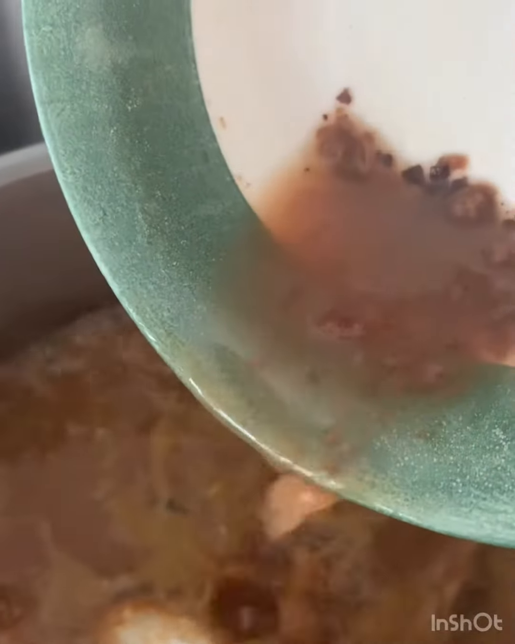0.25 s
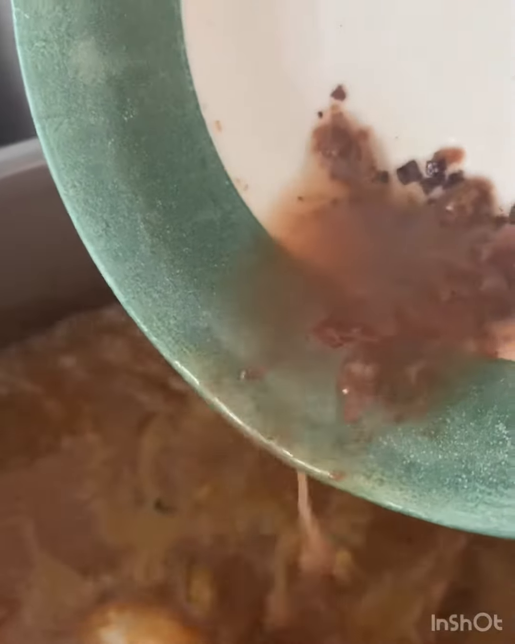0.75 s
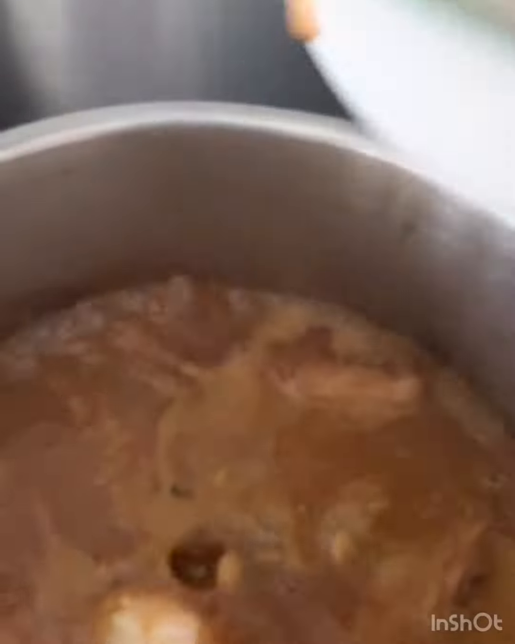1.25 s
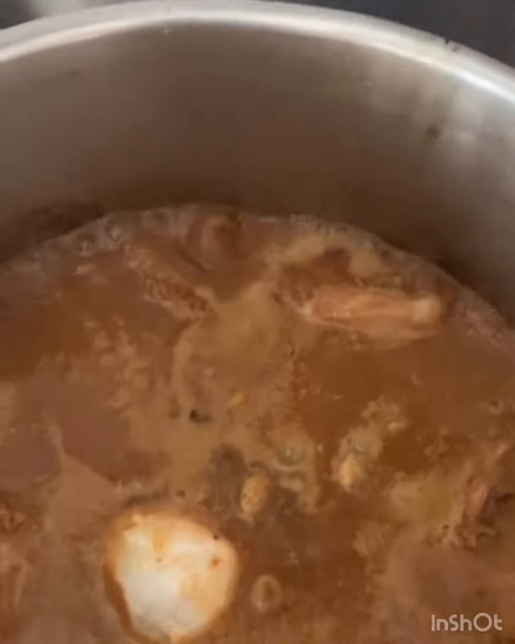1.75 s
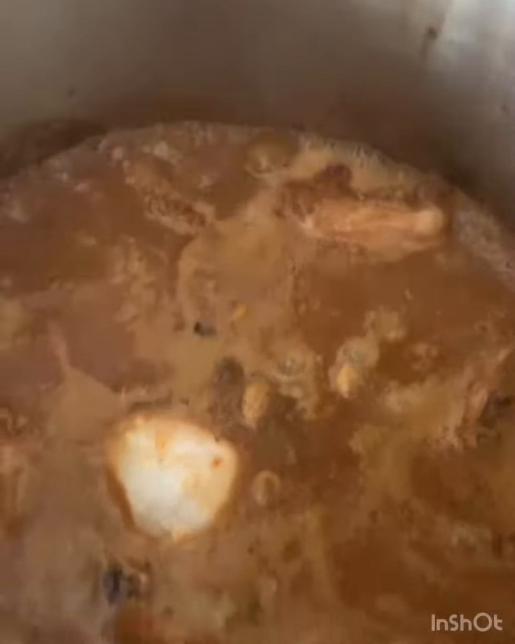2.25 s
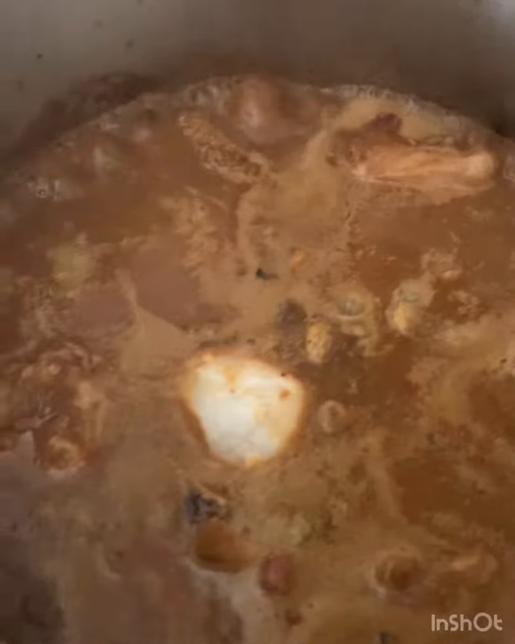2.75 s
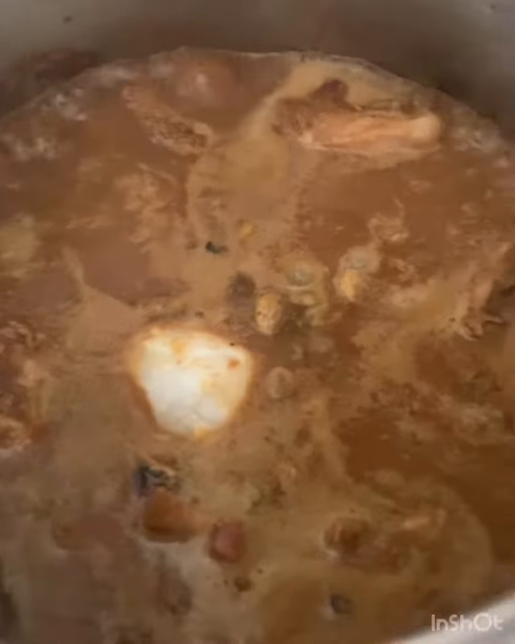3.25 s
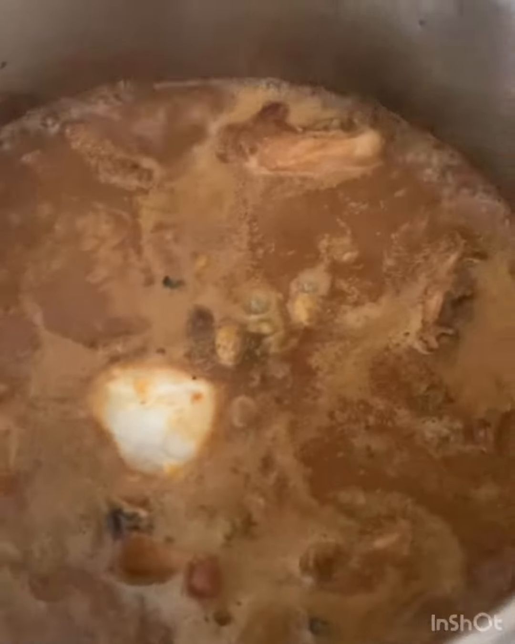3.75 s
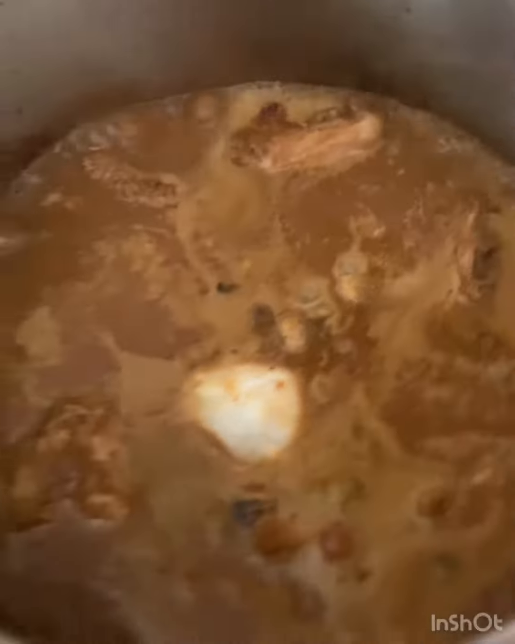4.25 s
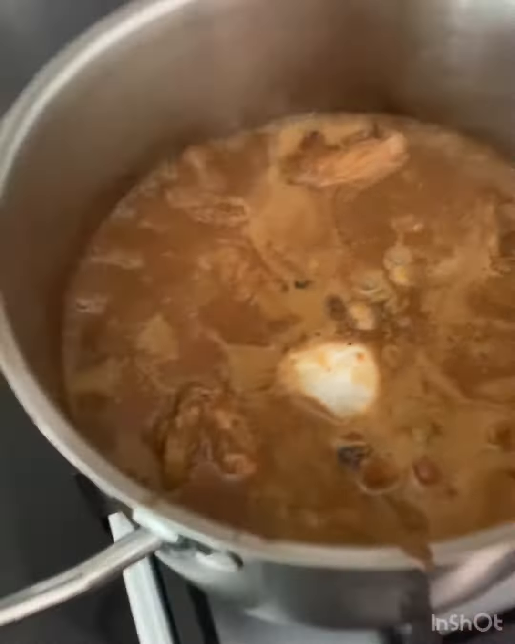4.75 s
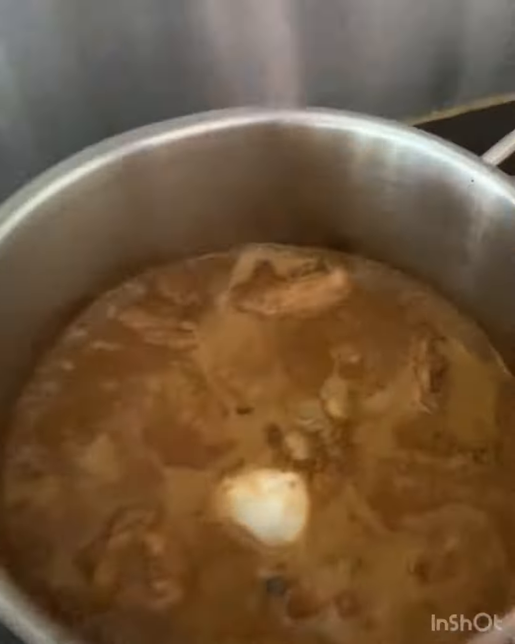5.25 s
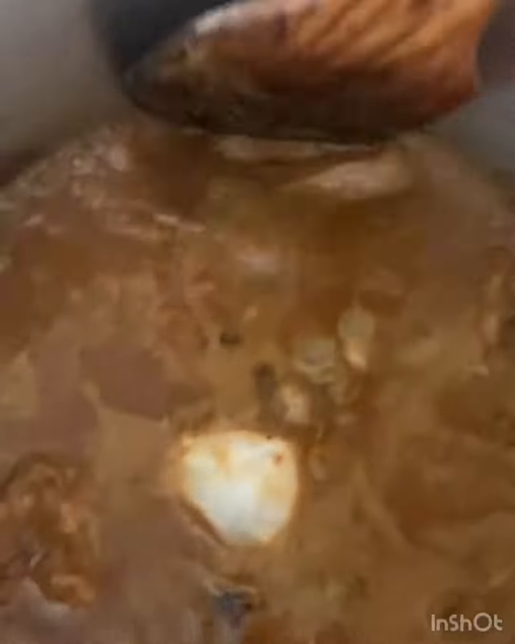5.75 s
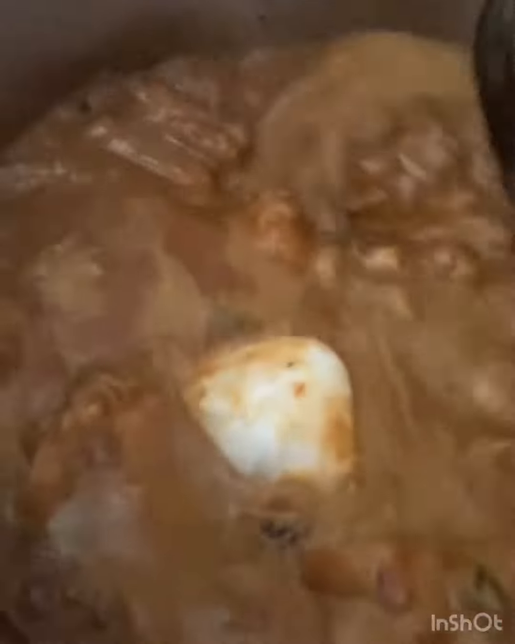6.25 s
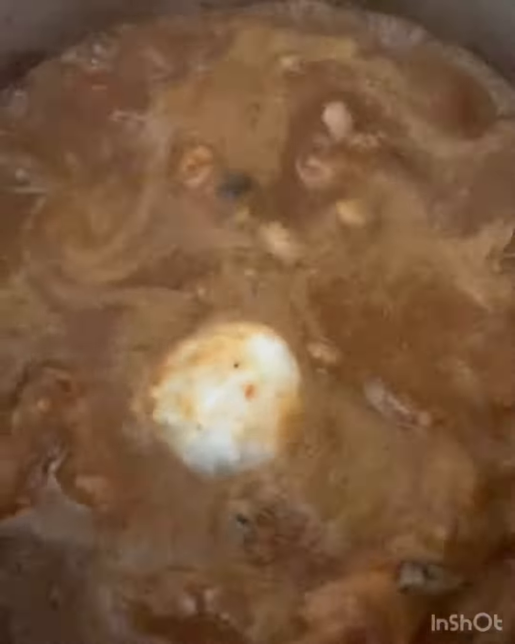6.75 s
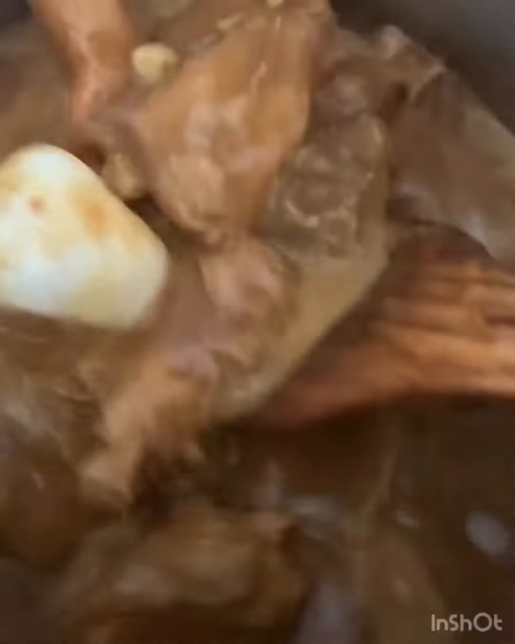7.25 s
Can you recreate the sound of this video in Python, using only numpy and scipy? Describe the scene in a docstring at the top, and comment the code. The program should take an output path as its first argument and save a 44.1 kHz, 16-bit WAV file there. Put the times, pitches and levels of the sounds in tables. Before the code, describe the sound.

Thick stew sizzles and spits in a steel pot under a humming cooker hood, with knocks and a wooden spoon scraping.

```python
"""Stew simmering under a cooker hood

Close on a pot of thick stew on a gas stove, from a hand-held phone with two microphone ports.
The hood fan hums overhead, its air changing colour as the phone moves in and draws back.
Stew pushed up the hot steel wall sizzles and spits. Dishes and a wooden spoon knock on pot and
stove, the kitchen answers, and near the end the spoon scrapes along the wall."""
import sys
import numpy as np
from scipy import signal
from scipy.fft import rfft, irfft, next_fast_len
from scipy.io import wavfile
from scipy.ndimage import uniform_filter1d, map_coordinates

SR = 44100
rng = np.random.default_rng(int(sys.argv[2]) if len(sys.argv) > 2 else 0)


def int16_out(signal):
    """Quantize to a 16-bit WAV file."""
    q = np.round(np.clip(np.atleast_2d(signal).T, -1, 1) * 32767)
    wavfile.write(sys.argv[1], SR, q.astype(np.int16))


N = 330750  # 7.5 s

# Smooth spectra of the hood's rumble and rushing air: (frequency [Hz], relative level [dB])
RUMBLE_SPECTRUM = [(12, -50), (30, -35), (55, -5), (70, -5.5), (150, -9.5), (250, -26), (300, -20),
                   (400, -70)]
AIR_SPECTRUM = [(140, -17), (250, -11), (450, -9), (900, -9), (1400, -17.5), (1900, -19.5), (4500, -26),
                (6000, -112), (10000, -120)]
# Low duct resonances: (frequency [Hz], width [Hz], gain [dB])
DUCT_LOW_MODES = [(88.5, 14.5, 3), (99, 5.4, 3.5), (125.7, 6.7, -1.5), (195, 32, -5), (212, 13.7, -3),
                  (245, 16, -10)]
# Higher ones, from two positions: (frequency [Hz], width [Hz], gain at the pot [dB], gain away [dB])
DUCT_HIGH_MODES = [(303, 7.5, -6, -9.5), (377, 17.6, -6, -6), (530, 28, 1, 4), (611, 27.4, 6, -16.5),
                   (783, 22, -31, 0), (1097, 38, -4, -6), (1330, 93, -6, -13), (1597, 63, -12.5, -14)]
# Where the phone is held: (time [s], distance from the pot [0 near, 1 away])
MIC_DISTANCE = [(0, 0.97), (1.4, 0.45), (2, 0.018), (4.2, 0.029), (4.8, 0.87), (5.3, 1), (5.65, 0.044),
                (7.5, 0.089)]
# Jolts of the hand on the phone: (time [s], level [dB])
HAND_JOLTS = [(3.84, -39), (6.37, -42), (6.75, -34), (7.45, -38)]
# Steady sizzle on the hot wall: (time [s], level [dB])
SIMMER_LEVEL = [(0, -44.5), (.9, -48), (1.6, -46), (2.0, -50.5), (2.4, -53.5), (3.2, -53.5), (3.6, -51),
                (4.9, -54), (5.15, -59.5), (5.5, -54.5), (6.0, -46), (7.5, -41)]
# Fresh stew wets the wall: (start [s], rise [s], hold [s], peak [dB], fade [dB/s],
# extra fine fizz [dB], extra coarse fizz [dB])
SIZZLE_SURGES = [(0.258, 0.05, 0.053, -40, 16, 5.5, -5), (1.11, 0.024, 0.1, -49, 7.9, 14, -6),
                 (3.36, 0.021, .02, -52.5, 49, 21, -3), (3.54, .03, .06, -67, 27, 21, 0),
                 (5.628, 0.042, 0.037, -32.5, 93, 2.8, -1), (6.08, 0.057, 0.032, -34, 93, 8.3, 0),
                 (6.238, 0.022, 0.089, -33.5, 65, 4, 2.5), (6.428, 0.044, 0.02, -38, 63, 9.4, -3),
                 (6.838, 0.027, 0.034, -38.5, 24, 2, 2.5), (7.0, 0.12, 0.051, -35, 40, 1, 1.5),
                 (7.122, 0.011, 0.02, -22.5, 74, 6, 3.5), (7.141, 0.025, 0.03, -22.5, 68, 9.1, 4),
                 (7.175, 0.02, 0.025, -24.5, 84, 5, 6), (7.235, .02, 0.04, -28, 60, 12, -1),
                 (7.3, 0.028, 0.036, -36, 66, 4.2, 2), (7.415, 0.034, .06, -28, 20, 6.4, -6)]
# Colour of the fizz: (frequency [Hz], relative level [dB])
FIZZ_SPECTRUM = [(600, -3.5), (900, -14), (1350, 7), (1600, 2), (1920, 8), (2300, 5), (2700, 5), (3300, 4),
                 (4500, 2.5), (6500, 5), (10000, 3.5), (16500, -5.5)]
# The loudest droplets: (time [s], level [dB], pitch [Hz])
LOUD_SPITS = [(0.0223, -7.5, 7500), (0.049, -17, 9470), (0.076, -21.5, 6760), (0.163, -16, 9600),
              (1.1263, -30, 13800), (1.405, -22, 6350), (1.7809, -22, 7900), (2.102, -26, 8210),
              (2.143, -22, 8750), (2.4568, -30, 8220), (2.7067, -31, 6700), (2.7801, -28, 8540),
              (2.8185, -30, 7240), (3.093, -39, 8130), (3.2397, -41, 8000), (3.3793, -20, 13900),
              (3.392, -20, 12700), (3.466, -26, 13300), (3.5518, -24, 14000), (3.6027, -24, 15000),
              (3.6284, -28.5, 13100), (3.7459, -26, 14100), (3.8406, -23.5, 7960), (3.8546, -25, 7300),
              (3.9963, -23.5, 4200), (3.9968, -21, 9000), (4.0034, -24, 6800), (4.1586, -35, 8070),
              (4.487, -30, 7410), (4.8823, -30, 7150), (4.9402, -26, 8140), (4.7288, -41, 8000),
              (4.9626, -24, 8800), (5.0585, -34, 8000), (5.2561, -39, 8000), (5.2845, -24.5, 7460),
              (5.3399, -32, 8000), (5.5874, -23, 8210), (5.6391, -23, 6520), (5.6744, -31, 6520),
              (5.683, -12.5, 6600), (5.8521, -16, 6980), (5.903, -18.5, 8900), (6.0133, -21, 8750),
              (6.112, -21, 8230), (6.14, -26, 8200), (6.2801, -8, 10200), (6.3365, -14, 8750),
              (6.3747, -8, 8810), (6.419, -14, 7750), (6.549, -14.5, 9630), (6.849, -15, 8250),
              (6.8957, -16, 9560), (6.9205, -15, 7000), (6.9212, -24, 2800), (6.9284, -17, 8140),
              (7.0282, -10, 14100), (7.0539, -19, 8870), (7.0784, -20, 7040), (7.1282, -15, 7660),
              (7.1347, -16, 9530), (7.157, -2, 8420), (7.2334, -7, 9350), (7.247, -8, 9240),
              (7.2644, -15, 8290), (7.316, -6, 9510), (7.3497, -14, 8200), (7.423, -22, 8300),
              (7.437, -6, 8200), (7.472, -6.5, 8250), (7.4924, -16, 7500)]
# Blows on pot and stove: (time [s], clack peak [dB], clack centre [Hz], clack width [Hz], rattle [s],
# thud peak [dB], push [s], lift of the stove's narrow modes [dB], room send [dB])
BLOWS = [(0.163, -16.5, 2000, 3000, 0.0064, -40, .0006, -3, 2),
         (.168, -11.5, 1930, 450, 0.0065, -31, 0.00065, 0, -10),
         (.177, -11, 1730, 500, 0.0064, -37, 0.00085, 2, -4),
         (.170, -16, 980, 500, 0.016, -25, 0.00049, -4, -1.5),
         (.185, -18, 875, 450, 0.0062, -28.5, 0.0013, -2, -8.5),
         (0.188, -12.5, 1760, 600, 0.0063, -32, 0.0005, -5, -14),
         (0.202, -21, 1550, 500, 0.006, -40, .0009, 0, -10),
         (.212, -22, 1480, 1600, 0.033, -40, 0.00088, 2, -1),
         (3.7945, -14.5, 1960, 400, 0.0069, -25, 0.0012, -3, -11),
         (3.7905, -20, 1290, 397, 0.037, -8, 0.0026, -5.5, -8.5),
         (3.796, -18, 585, 400, 0.0098, -7, 0.0049, -6.5, -9),
         (3.821, -26, 1500, 890, 0.022, -24, 0.0038, 7, -5),
         (3.849, -30, 1870, 1000, 0.04, -28, 0.0019, 0, -10),
         (4.566, -37, 1500, 3000, 0.028, -37, 0.0021, 0, -4),
         (4.583, -24, 1200, 3500, 0.015, -26, 0.002, 2, -8.5),
         (4.636, -33, 1300, 2000, 0.016, -26, 0.0027, -9, -3.5),
         (5.684, -13, 3200, 3000, 0.005, -40, .001, 0, -14),
         (5.683, -11, 1560, 220, 0.003, -11.5, 0.00074, -6, -34),
         (5.684, -9, 625, 298, 0.0015, -18, 0.0014, 14, -11.5),
         (5.694, -19.5, 1130, 300, 0.013, -18, 0.0022, 8, -9.5),
         (6.288, -20.5, 1390, 700, 0.013, -44, 0.00071, 2, -8),
         (6.3725, -16, 3120, 1500, 0.0033, -42, 0.0011, -2, -20),
         (6.373, -7, 1930, 1190, 0.0033, -16, 0.0015, -16, -19),
         (6.374, -14.5, 630, 300, 0.0033, -16.5, 0.00098, 21, -9.5),
         (6.376, -6, 2330, 300, 0.0033, -40, 0.0017, 0, -28),
         (6.4183, -16, 2610, 2000, 0.004, -31, .002, 0, -18),
         (6.423, -12.5, 2180, 800, 0.0042, -17.5, 0.0019, 1, -24),
         (6.479, -24, 2260, 300, 0.01, -30, 0.0027, 5, -16),
         (6.692, -16.5, 700, 800, 0.0051, -15.5, 0.0042, -2, -11),
         (6.736, -20.5, 734, 500, 0.0038, -32, 0.00095, -12, -25),
         (6.805, -24, 1180, 2000, 0.0023, -47, 0.0012, 3, -1)]
# Ring of pot and dishes, and of the stove: (frequency [Hz], width [Hz], gain [dB])
POT_MODES = [(590, 190, 3), (806, 150, 2), (1023, 90, -1), (1150, 88, -2), (1316, 43, 6), (1564, 79, -4.5),
             (1766, 64, 5), (1870, 90, -6.5), (1984, 68, 4), (2320, 100, -1.5), (2620, 70, 1.5),
             (3130, 88, 6), (3620, 93, -4), (3860, 72, -12), (4400, 200, 1)]
STOVE_MODES = [(125.7, 17, 5), (210.2, 13, 15), (312, 105, 0.5), (371, 9.4, 18), (435, 30, 8),
               (535, 68, 15), (595, 97, 13.5), (696, 32, 6), (980, 52, -12)]
# Reverberation of the kitchen: (frequency [Hz], time to fall 60 dB [s])
KITCHEN_DECAY = [(150, 0.1), (500, 0.43), (2500, 0.23), (8000, 0.11)]
# The spoon drags along the wall: (time [s], level [dB])
SCRAPE_LEVEL = [(5.7, -90), (5.75, -54), (6.162, -41), (6.298, -44), (6.372, -33.5), (6.516, -42.5),
                (6.734, -52), (7.0, -40), (7.12, -44), (7.4, -38.5), (7.5, -45)]
# Ring of its wooden blade: (frequency [Hz], width [Hz], gain [dB])
SPOON_MODES = [(713, 100, 8.5), (1400, 110, 5), (2080, 260, 4.5), (3060, 480, -18)]
# How alike the two microphone ports hear: (frequency [Hz], likeness [0-1])
PORT_LIKENESS = [(60, .998), (180, .99), (300, .7), (440, .3), (560, .45), (750, .45), (1000, .35),
                 (2000, .55), (3200, .3), (5000, .85), (16000, .9)]
# Path round the phone: (frequency [Hz], left phase lead [rad])
PORT_LEAD = [(0, 0), (250, .05), (400, .6), (520, -1.8), (650, -.3), (1300, -1.8), (1800, 1.6), (3100, 3),
             (4000, 1.2), (5300, 3.14), (8300, 6.28), (11600, 9.42), (14800, 12.56), (17000, 14)]
# Balance of the ports: (frequency [Hz], left minus right [dB])
PORT_BALANCE = [(60, 0), (150, -1), (280, -.5), (550, -3.6), (1000, -.5), (2000, .6), (8000, -.1)]

DIRECT = [[1], [0]]  # sources have two rows, direct and scattered; this feeds only the first
SIZZLE_REF_DB = -40  # fizz and small spits follow the sizzle's level relative to this


def amp(db):
    return 10 ** (np.asarray(db) / 20)


def unit_rms(x):
    return x / np.sqrt(np.mean(x ** 2) + 1e-20)


def along(points, hz):
    """Read (frequency, value) points on a log axis."""
    f, values = np.transpose(points)
    return np.interp(np.log(hz + 1), np.log(f + 1), values)


def curve(points):
    """Read (time, value) points at every sample."""
    return np.interp(np.arange(N) / SR, *np.transpose(points))


def wobble(rate):
    """A smooth random curve, rate knots a second."""
    return map_coordinates(rng.standard_normal(int(N * rate / SR) + 4), [np.arange(N) * rate / SR])


def filtered(x, response):
    """Filter x by a complex response of frequency."""
    m = next_fast_len(N + SR // 2)
    return irfft(rfft(x, m) * response(np.fft.rfftfreq(m, 1 / SR)), m)[..., :N]


def resonance(f, hz, width):
    """One causal resonance, gain 1 at its centre."""
    return 1j * f * width / (hz * hz - f * f + 1j * f * width)


def patchy_noise(depth_db):
    """Two white noises that share patches of random gain."""
    spectra = signal.stft(rng.standard_normal((2, N)), nperseg=512)[2]
    patches = uniform_filter1d(uniform_filter1d(rng.standard_normal(spectra.shape[1:]), 8, 0), 8, 1)
    return signal.istft(spectra * amp(depth_db * unit_rms(patches)), nperseg=512)[1][:, :N]


def draught(spectrum, modes, patchy_db):
    """Steady air noise: a smooth spectrum with the duct's resonances standing on it."""
    def response(f):
        peak_power = sum(np.abs(amp(db) * resonance(f, hz, w)) ** 4 for hz, w, db in modes) ** .5
        return np.sqrt(amp(along(spectrum, f)) ** 2 + peak_power)
    return unit_rms(filtered(patchy_noise(patchy_db), response))


def rushing_air():
    """The duct's colour cross-fades as the microphone moves to and from the pot."""
    away = np.clip(curve(MIC_DISTANCE), 0, 1)
    near = draught(AIR_SPECTRUM, [(hz, w, db) for hz, w, db, _ in DUCT_HIGH_MODES], patchy_db=1.4)
    far = draught(AIR_SPECTRUM, [(hz, w, db) for hz, w, _, db in DUCT_HIGH_MODES], patchy_db=1.4)
    return np.sqrt(1 - away) * near + np.sqrt(away) * far


def hood():
    """Overhead, the fan's blade tone wavers over duct rumble and air; both start louder and settle."""
    t = np.arange(N) / SR
    blade_db = -35 + wobble(3.6)
    blade_hz = 132.3 + 1.52 * wobble(8)
    tone = amp(blade_db) * np.sqrt(2) * np.sin(2 * np.pi * np.cumsum(blade_hz) / SR)
    rumble_db = -36 + 6.5 * np.exp(-t / .19) - .14 * wobble(3.02)
    rumble = amp(rumble_db) * draught(RUMBLE_SPECTRUM, DUCT_LOW_MODES, patchy_db=1)
    lift_db = np.clip(2 * (t - 5.1), 0, 1)  # the air is a little louder once stirring begins
    air_db = -39 + 3.5 * np.exp(-t / 1.3) + lift_db - .14 * wobble(2.88)
    return rumble + amp(air_db) * rushing_air() + tone * DIRECT


def handling():
    """The hand-held phone sways: low pressure on both ports alike, with a few short jolts."""
    t = np.arange(N) / SR
    sway = filtered(rng.standard_normal(N), lambda f: resonance(f, hz=39, width=28) ** 2)
    jolts = sum(amp(db) * np.exp(-((t - when) / .11) ** 2) for when, db in HAND_JOLTS)
    sway_db = -45.5 - .5 * wobble(3.67)
    return (amp(sway_db) + jolts) * unit_rms(sway) * DIRECT


def sizzle_levels():
    """Surges swell, hold and fade over the simmer: level, extra fine and extra coarse fizz in dB."""
    t = np.arange(N) / SR
    power = amp(curve(SIMMER_LEVEL)) ** 2
    tint = np.zeros((2, N))
    for start, rise, hold, db, fade, *extra_db in SIZZLE_SURGES:
        swell = np.clip((t - start) / max(rise, .005), 0, 1) ** 2
        surge = (swell * amp(db - fade * np.maximum(t - start - rise - hold, 0))) ** 2
        power += surge
        tint += np.outer(extra_db, surge)
    return 10 * np.log10(power), *(tint / power)


def bubbles(count=6000, life_cycles=7):
    """Small bubbles ring a few cycles at a rising pitch before they burst."""
    when, pitch, size = rng.random((count, 3)).T[:, :, None]
    t = np.arange(160) / SR
    cycles = 1500 * 8 ** pitch * t  # starting pitches span 1.5 to 12 kHz
    strength = (size + .03) ** -.4 * np.sqrt(8 ** pitch)
    envelope = cycles * np.exp(-3 * cycles / life_cycles) * np.hanning(2 * len(t))[len(t):]
    rings = strength * envelope * np.sin(2 * np.pi * cycles * (1 + .015 * cycles))
    samples = (when * N).astype(int) + np.arange(len(t))
    return unit_rms(np.bincount(samples.ravel(), rings.ravel(), N + len(t))[:N])


def pops(decay_s=.0006):
    """Larger bubbles burst in clumps, each a puff that starts at once and dies away."""
    chance = 1200 / SR * amp(9.5 * wobble(30))
    sizes = amp(2.5 * np.minimum(rng.exponential(size=N), 3))
    onsets = (rng.random(N) < chance) * sizes
    envelope = signal.lfilter([1], [1, -np.exp(-1 / (decay_s * SR))], onsets)
    return unit_rms(envelope * rng.standard_normal((2, N)))


def sizzle(coarse_below_hz=5200, fine_above_hz=11800):
    """Close by, countless tiny bubbles burst on the hot wall: a hiss with pops and ringing on top."""
    def bands(f):
        low = 1 / (1 + (f / coarse_below_hz) ** 6)
        high = 1 / (1 + (fine_above_hz / (f + 1)) ** 10)
        return amp(along(FIZZ_SPECTRUM, f)) * np.array([(1 - low) * (1 - high), low, high])[:, None]

    level_db, extra_fine_db, extra_coarse_db = sizzle_levels()
    level_db += wobble(11)  # the level flickers
    coarse_db = -42 + .73 * (level_db - SIZZLE_REF_DB) + extra_coarse_db
    fine_db = -44 + .83 * (level_db - SIZZLE_REF_DB) + extra_fine_db
    crackle = .42 * pops()
    hiss = patchy_noise(depth_db=1.3) * amp(wobble(90))
    ringing = .55 * np.array([bubbles(), bubbles()])
    middle, coarse, fine = filtered(hiss + crackle + ringing, bands)
    return (amp(level_db) * unit_rms(middle) + amp(coarse_db) * unit_rms(coarse)
            + amp(fine_db) * unit_rms(fine))


def spits(small_count=130, pop_at_s=.0007, lift_db=1.5, hiss_t60_s=.012):
    """A droplet bursts on the steel: one sharp pop and a short hiss. Small ones come by chance."""
    out, t = np.zeros((2, N + SR)), np.arange(512) / SR
    f = np.fft.rfftfreq(len(t), 1 / SR)
    when, size, pitch = rng.random((small_count, 3)).T
    sizzle_db = sizzle_levels()[0][(when * N).astype(int)]
    small_db = -29 + .85 * (sizzle_db - SIZZLE_REF_DB) - 3 * np.log(size + .05)
    small_spits = zip(when * N / SR, small_db, 8800 * (.8 + .7 * pitch))
    for start, db, hz in [*LOUD_SPITS, *small_spits]:
        puff = amp(-13 - 60 * t / hiss_t60_s) * rng.standard_normal((2, len(t)))
        puff[0, round(pop_at_s * SR)] = rng.choice([-1, 1])  # the pop takes the direct path only
        puff = irfft(rfft(puff) * resonance(f, hz, 1.1 * hz) * resonance(f, hz, 2.5 * hz))
        out[:, round(start * SR):][:, :len(t)] += amp(db + lift_db) * puff / np.abs(puff[0]).max()
    return out[:, :N]


def knocks(uneven_db=2, narrow_hz=32):
    """A blow's rough contact rings the pot; its smooth push rings the stove, duller when it is soft."""
    out, t = np.zeros((2, N + SR)), np.arange(2 * (SR // 8)) / SR
    f = np.fft.rfftfreq(len(t), 1 / SR)
    for start, clack_db, centre, width, rattle_s, thud_db, push_s, ring_db, room_db in BLOWS:
        pot = sum(amp(db + uneven_db * rng.standard_normal()) * resonance(f, hz, w)
                  for hz, w, db in POT_MODES)
        pot += amp(-6)  # dead clatter between the modes
        age = t / max(rattle_s, 5e-4)
        contact = age ** .31 * np.exp(-2 * age * age) * rng.standard_normal(len(t))
        clack = irfft(rfft(contact) * pot * resonance(f, centre, width) ** 2)
        stove = sum((-1) ** k * amp(db + ring_db * (w < narrow_hz)) * resonance(f, hz, w)
                    for k, (hz, w, db) in enumerate(STOVE_MODES))
        push = np.sin(np.pi * np.minimum(t / max(push_s, 3e-4), 1)) ** 2
        thud = -irfft(rfft(push) * stove)
        blow = amp(clack_db) * clack / np.abs(clack).max() + amp(thud_db) * thud / np.abs(thud).max()
        out[:, round(start * SR):][:, :len(t)] += blow * amp([[0], [room_db]])  # far knocks are wetter
    direct, room_send = out[:, :N]
    return direct * DIRECT + kitchen(room_send)


def kitchen(x):
    """The walls answer about 7 ms later, each frequency dying at its own speed."""
    hz, t, spectra = signal.stft(rng.standard_normal((2, SR // 2)), SR, nperseg=256)
    decay = amp(-60 * t / along(KITCHEN_DECAY, hz)[:, None])
    tail = signal.istft(spectra * decay, SR, nperseg=256)[1]
    delayed = np.pad(x, (300, 0))[None]
    return signal.fftconvolve(delayed, tail / np.linalg.norm(tail[0]), axes=1)[:, :N]


def spoon_scrape(clump_db=4):
    """Wood drags on wet steel: clumped grains ring the spoon's blade."""
    grains = rng.standard_normal(N) * amp(clump_db * wobble(70))
    blade = filtered(grains, lambda f: sum(amp(db) * resonance(f, hz, w) ** 2
                                           for hz, w, db in SPOON_MODES))
    return amp(curve(SCRAPE_LEVEL)) * unit_rms(blade) * DIRECT


def microphone_ports(pair):
    """Direct and scattered sound reach two ports: partly alike, shifted by the path round the phone."""
    def blend(hz):
        angle = np.arccos(np.clip(along(PORT_LIKENESS, hz), 0, 1)) / 2
        return np.array([np.cos(angle), np.sin(angle)])

    def paths(hz):
        lead = np.interp(hz, *np.transpose(PORT_LEAD))
        left = np.exp(.5j * lead) * amp(along(PORT_BALANCE, hz) / 2)
        return np.array([left, 1 / left])

    direct, scattered = filtered(pair, blend)
    return filtered(np.array([direct + scattered, direct - scattered]), paths)


def scene():
    """Everything at the stove, heard from the phone beside the pot."""
    return microphone_ports(hood() + handling() + sizzle() + spits() + knocks() + spoon_scrape())


def record(dry):
    """The phone rounds off the highest peaks and keeps nothing above its band limit."""
    rounded = dry / (1 + np.abs(dry / .95) ** 4) ** .25
    return filtered(rounded, lambda hz: hz < 15850)


dry = scene()
out = record(dry)
int16_out(out)
```